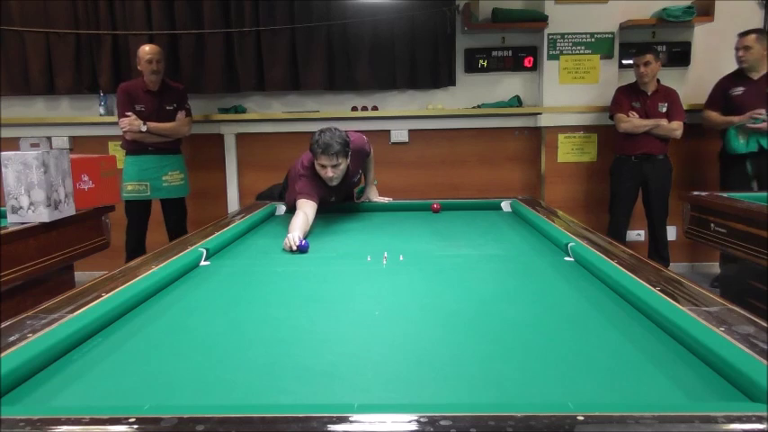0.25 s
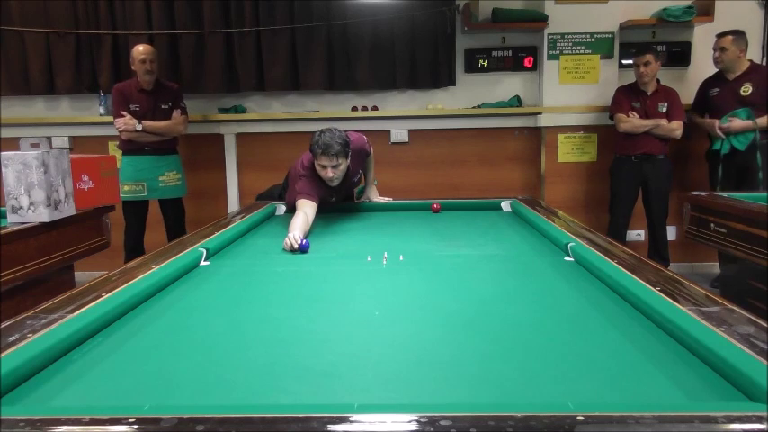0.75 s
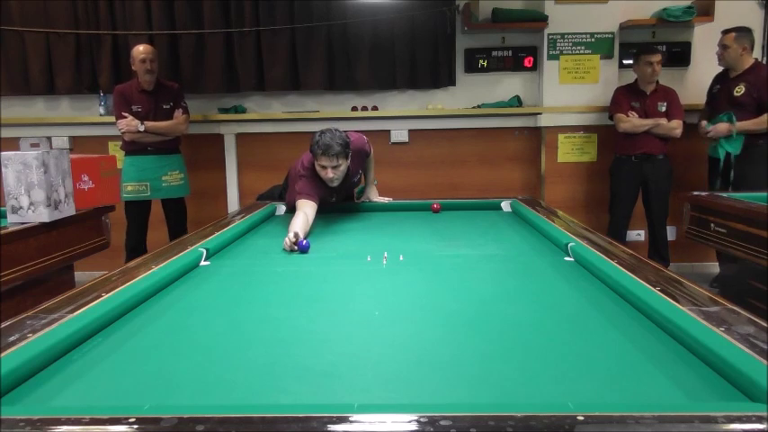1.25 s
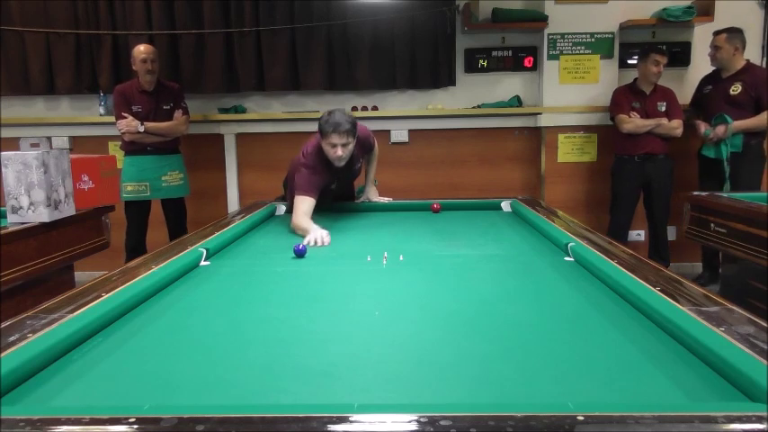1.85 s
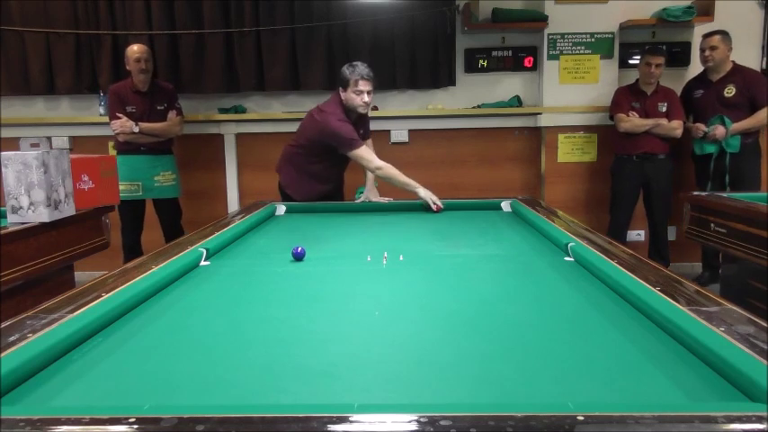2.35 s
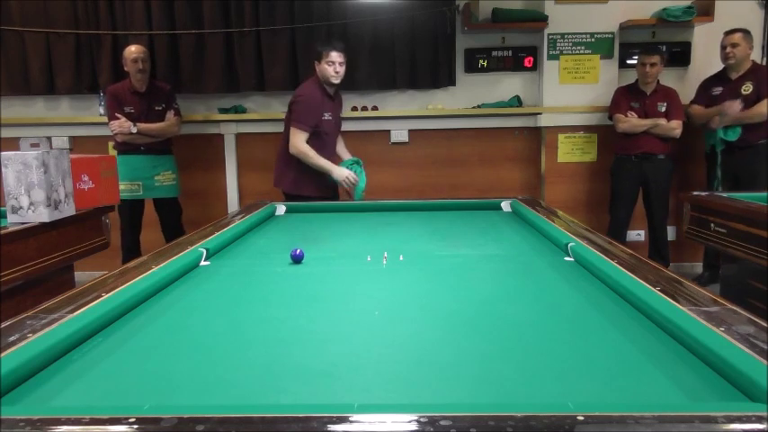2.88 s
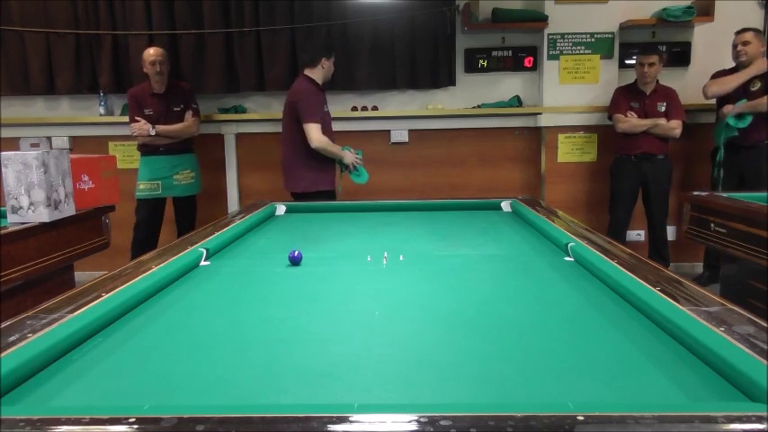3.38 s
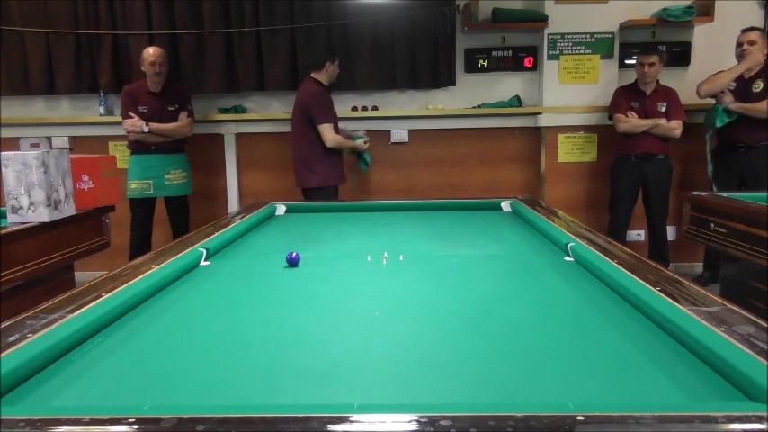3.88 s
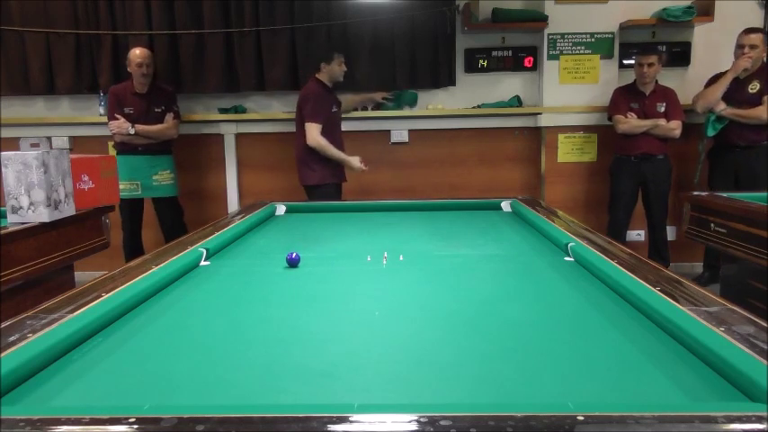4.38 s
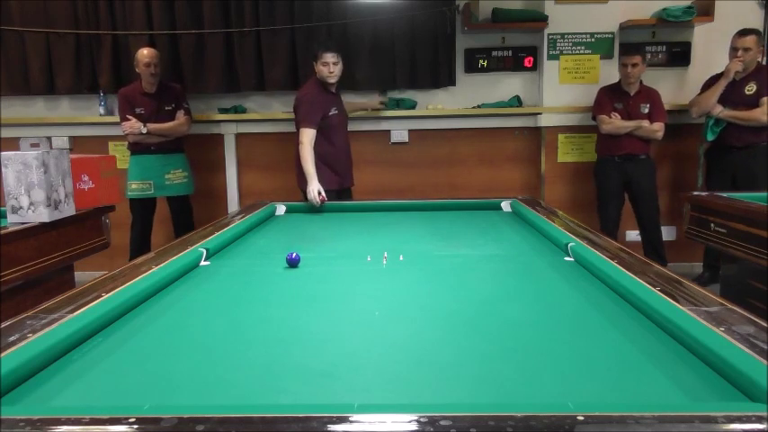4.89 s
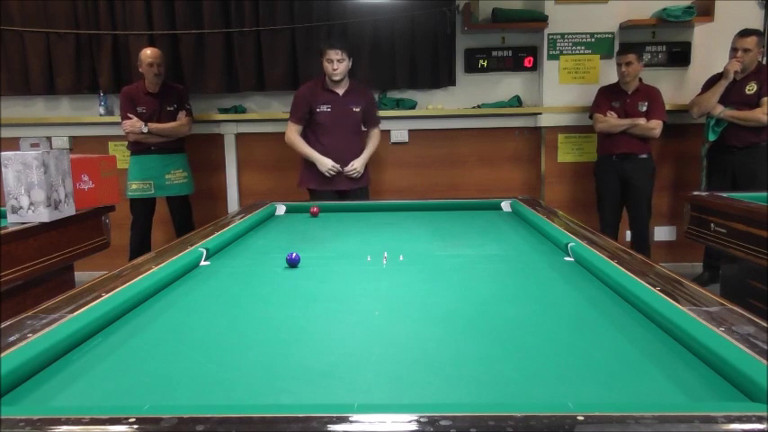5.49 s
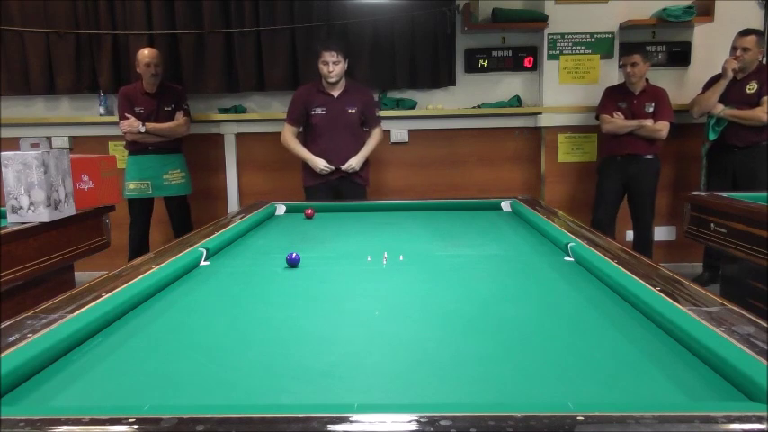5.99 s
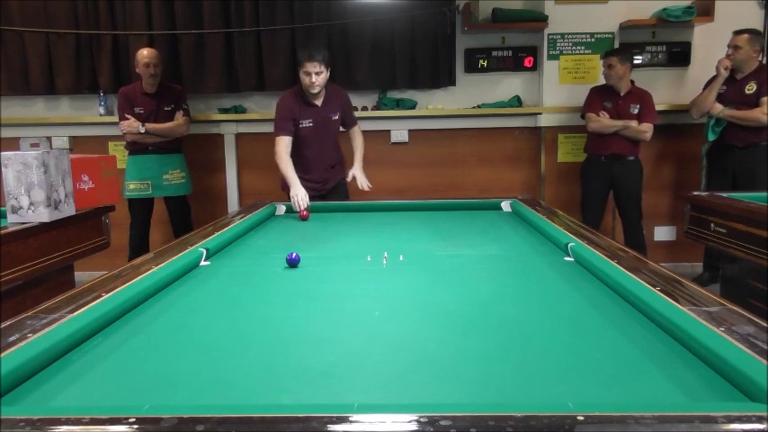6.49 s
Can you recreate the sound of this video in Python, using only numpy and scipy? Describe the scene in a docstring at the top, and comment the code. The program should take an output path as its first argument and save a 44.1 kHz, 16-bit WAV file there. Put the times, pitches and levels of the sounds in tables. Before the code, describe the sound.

An indoor billiard hall with steady low ventilation rumble, wavering hum and thin hiss. A ball is pressed and set down with muffled bumps, a hand sweeps airily over the cloth, and clothing rustles faintly with tiny ticks. Then a dropped ball strikes the slate very loudly and bounces faster and weaker. The microphone stands at the end of the table; the room drops quieter after the first blow.

```python
"""Dropped ball in a billiard hall

Place: a billiard hall; filtered noise makes the ventilation's rumble and wavering hum, over a thin steady hiss.
Microphone at the end of the table: a ball is set down, a hand sweeps the cloth, clothes rustle (shaped noise).
Then a dropped ball bounces ever faster on the slate; each blow rings table modes and dense hall noise. The
first bounce makes the gain control turn the whole room down, and it recovers only slowly."""
import sys
import numpy as np
from scipy import signal
from scipy.fft import rfft, irfft
from scipy.io import wavfile
from scipy.ndimage import uniform_filter1d

SR = 44100
rng = np.random.default_rng(int(sys.argv[2]) if len(sys.argv) > 2 else 0)


def unload_wav(signal):
    """Save mono or channel-first audio to the path in sys.argv[1] as 16-bit WAV at rate SR, clipped to [-1, 1]."""
    wavfile.write(
        sys.argv[1],
        SR,
        np.round(np.clip(np.atleast_2d(signal).T, -1, 1) * 32767).astype(np.int16),
    )


N = 297234  # length in samples

# Levels are those before the gain control; colour tables give relative levels.
# air rumble of the ventilation: pitch_hz, level_db_per_hz
VENT_COLOUR = [(20, -38), (33, -16), (60, -3), (80, -7), (100, -3), (130, -3.5), (160, -5.5), (300, -7),
               (420, -16.5), (560, -18.5), (780, -24.5), (1050, -35), (1280, -52), (2000, -72)]
# fan and duct resonances and a thin whine: pitch_hz, width_hz, level_db
HUM = [(35.5, 15, -38), (49.4, 1.5, -35), (66.8, 8.2, -41), (108.8, 16, -28.5), (117.8, 24, -29.5),
       (140, 16, -34), (490, 34, -44.5), (10050, 220, -69.5)]
# steady hiss: pitch_hz, level_db_per_hz
HISS_COLOUR = [(760, -42.5), (1300, -9), (1530, 1), (1890, -1.5), (2010, -1), (2530, -6), (4160, -6.5),
               (5280, -11), (5980, -3.5), (7360, 0), (11100, -2.5), (13400, -2.5), (15500, -4)]
# the room's lean to the left: pitch_hz, left_minus_right_db
ROOM_BALANCE = [(110, -1), (200, 0.5), (380, 5), (700, 3.5), (1300, 0.5), (2400, 0)]
# the room's left-right likeness: pitch_hz, likeness (1 = same in both channels)
ROOM_SAME = [(60, 0.94), (150, 0.91), (400, 0.93), (1000, 0.88), (1800, 1), (4000, 1), (6800, 1),
             (8500, 0.88), (10000, 0.067), (15000, 0.13)]
# decay of the hall: pitch_hz, t60_s
HALL = [(100, 0.64), (500, 0.39), (1000, 0.35), (2500, 0.3), (5000, 0.37), (8000, 0.41), (15000, 0.16)]
# lean of hits to the left: pitch_hz, left_minus_right_db
HIT_BALANCE = [(60, -3), (200, 0.5), (700, 5.5), (1290, 4), (2400, 2), (8000, -1.5)]
# left-right likeness of hits and cloth strokes: pitch_hz, likeness
HIT_SAME = [(60, 0.91), (300, 0.88), (1300, 0.78), (4000, 0.99), (7000, 1), (14000, 0.35)]
# hand gliding over the cloth: time_s, level_db
SWEEP = [(1.7, -61), (2.074, -39), (2.2, -43.5), (2.32, -57)]
# colour of the hand's sweep: pitch_hz, level_db_per_hz
SWISH_COLOUR = [(4000, -22), (5400, -15), (6300, -6), (7600, 3), (8800, 0), (10500, -5.5), (13000, -9),
                (16000, -12)]
# strokes of sleeves and the wiping cloth: middle_s, half_length_s, swish_db, scuff_db, scuff_hz
RUSTLES = [(.45, .15, -57, -66.5, 1800), (1.912, .15, -50, -57.5, 2150), (2.466, 0.098, -53, -55, 3080),
           (3.687, 0.022, -58, -68, 1700), (4.282, 0.021, -49, -55, 3340), (4.39, .04, -57, -60, 2940),
           (4.535, .02, -52, -59, 2200), (6.28, .045, -53.5, -74, 2500)]
# colour of a rustle's swish: pitch_hz, level_db_per_hz
SLEEVE_COLOUR = [(4000, -20), (5500, -14), (6500, -5.5), (7150, -2), (7450, 2), (7800, -1), (9600, -5),
                 (11000, -11), (16000, -16)]
# small handling ticks: start_s, level_db, low_edge_hz
TICKS = [(0.9048, -45.5, 1390), (1.2127, -51, 7400), (2.653, -49.5, 6500), (3.9794, -55, 7000),
         (4.1942, -56, 2000), (4.515, -57, 1600)]
# reflections of a light tap: pitch_hz, level_db_per_hz
SPRAY_COLOUR = [(100, 9), (750, 0.5), (1100, -5.5), (1700, 0), (3500, -10), (5200, -15.5), (7500, -10.5),
                (16000, -18)]
# a ball pressed onto the cloth bumps under the hand: start_s, first_bump_db, last_bump_db
PRESSES = [(.894, -28, -22), (1.304, -21, -26.5)]
# a ball set down by hand: start_s, force_db (0 = first bounce of the drop), hardness_hz
SET_DOWN = (1.3014, -15, 520)
# ringing of slate, frame and ball: pitch_hz, level_db, t60_s
TABLE_MODES = [(251.3, -2, 0.41), (280, -8, 0.2), (326.4, -1.5, 0.3), (416.3, -6, .35), (483, -11, 0.11),
               (523.7, -2, 0.53), (553.6, -0.5, 0.43), (639, 1.5, 0.21), (720, -8, 0.097), (831, -6, 0.23),
               (947, -10, 0.22), (988, -15, 0.5), (1046, -15, 0.2), (1082, -25, 0.19), (1230, -27, 0.22),
               (1652, -12, 0.28), (1700, -25, 0.4), (1797, -16, 0.17), (2110, -1.5, 0.12),
               (2111, -5.5, 0.15), (2150, -23, 0.1), (2485, -13, 0.18), (2710, -14, .22),
               (2873, -6.5, 0.13)]
# dense ring of the table in the hall: pitch_hz, level_db_per_hz
TABLE_COLOUR = [(40, -29), (110, -5.5), (190, -6.5), (290, 2), (400, -2), (570, -3), (900, -5),
                (1130, -14.5), (1280, -23), (1650, -17.5), (2900, -19), (3900, -28.5), (4500, -31.5),
                (16000, -92)]
# bright click of a blow: pitch_hz, level_db_per_hz
CLICK_COLOUR = [(1000, -44), (4000, -10), (5300, -7), (7000, 3.5), (9000, -1.5), (12000, -9.5),
                (16000, -16)]

VENT_DB, HISS_DB = -26.5, -52.5
# the player walks with the cloth in hand, rustling at random
FIDGET_FROM_S, FIDGET_TO_S, FIDGET_GAP_S, FIDGET_HALF_S = 2.6, 4.15, 0.16, 0.054
FIDGET_SWISH_DB, FIDGET_SCUFF_DB, FIDGET_SCUFF_HZ = -57.5, -70, 1900  # middle levels, band centre
TICK_TOP_HZ = 10800
# bump spacing, first pitch, pitch ratio to the bump before, bandwidth
BUMP_GAP_S, BUMP_HZ, BUMP_SINK, BUMP_OCTAVES = 0.026, 552, 0.723, 1.2
DROP_S, FIRST_FLIGHT_S = 5.082, 0.172  # the dropped ball first lands, and stays in the air this long
# share of its speed that the ball keeps: the cloth swallows more of a slow blow
REBOUND_FAST, REBOUND_SLOW = 0.779, 0.708
FORCE_POWER = 0.91  # force grows with landing speed to this power
HARD_HZ, HARD_POWER = 2460, 0.66  # first contact's hardness as a corner; it follows speed to this power
EDGE_HZ = 15750  # upper limit of the band


def amp(db):
    """Decibels to gain."""
    return 10 ** (np.asarray(db) / 20)


def evened(x):
    """Scales to rms 1."""
    return x / np.sqrt(np.mean(x ** 2) + 1e-20)


def punch(x, size=1764):
    """Scales a hit to rms 1 over its first 40 ms."""
    return x / np.sqrt(np.mean(x[:, :size] ** 2))


def read(points, hz):
    """Reads a table along a log-frequency axis."""
    f, value = np.transpose(points)
    return np.interp(np.log(hz + 1), np.log(f), value)


def add(mix, s, sound):
    """Mixes a stereo sound in at time s."""
    part = mix[:, round(s * SR):][:, :sound.shape[1]]
    part += sound[:, :part.shape[1]]


def noise(colour, same, balance, size=N):
    """Stereo noise with a given spectrum, left-right likeness and balance."""
    hz = np.fft.rfftfreq(size, 1 / SR)
    mid, side = rfft(rng.standard_normal((2, size)))
    likeness = np.clip(read(same, hz), -1, 1)
    sign = np.array([[1], [-1]])  # left, right
    pair = np.sqrt(1 + likeness) * mid + sign * np.sqrt(1 - likeness) * side
    pair *= amp(sign * read(balance, hz) / 2)
    return evened(irfft(pair * amp(read(colour, hz)), size))


def hall_tail(colour, early_db, early_s, rise_s, size=32768):
    """About 0.7 s of dense ringing: an extra early part, while each band dies at the hall's pace."""
    hz, t, z = signal.stft(noise(colour, HIT_SAME, HIT_BALANCE, size=size), SR, nperseg=256)
    decay = amp(-60 * t / read(HALL, hz)[:, None])
    tail = signal.istft(z * decay, SR, nperseg=256)[1][:, :size]
    t = np.arange(size) / SR
    early = 1 + amp(early_db) * np.exp(-t / early_s)
    return tail * early * (1 - np.exp(-t / rise_s))


def background():
    """Rumbling air with a wavering hum (noise through narrow resonances), over a thin steady hiss."""
    hz = np.fft.rfftfreq(N, 1 / SR)
    hum = np.zeros(N)
    for centre, width, db in HUM:
        resonance = 1 / (1 + (2 * (hz - centre) / width) ** 2)
        hum += amp(db) * evened(irfft(rfft(rng.standard_normal(N)) * resonance, N))
    air = amp(VENT_DB) * noise(VENT_COLOUR, ROOM_SAME, ROOM_BALANCE)
    hiss = amp(HISS_DB) * noise(HISS_COLOUR, ROOM_SAME, ROOM_BALANCE)
    return hum + air + hiss


def fidgets(spread_db=2):
    """Faint strokes of clothing at uneven times and strengths, as rows like RUSTLES."""
    rows = []
    for s in np.arange(FIDGET_FROM_S, FIDGET_TO_S, FIDGET_GAP_S):
        late, swish, scuff = rng.uniform(-1, 1, 3)
        middle = s + FIDGET_GAP_S * late / 2
        swish_db = FIDGET_SWISH_DB + spread_db * swish
        scuff_db = FIDGET_SCUFF_DB + spread_db * scuff
        rows.append((middle, FIDGET_HALF_S, swish_db, scuff_db, FIDGET_SCUFF_HZ))
    return rows


def cloth(grain_db=0.5):
    """Fibres rubbing: one long sweep of the hand, and brief rustles of clothes."""
    t = np.arange(N) / SR
    s, db = np.transpose(SWEEP)
    sweep_db = np.interp(t, s, db, left=-120, right=-120)
    out = amp(sweep_db) * noise(SWISH_COLOUR, HIT_SAME, ROOM_BALANCE)
    sleeve = noise(SLEEVE_COLOUR, HIT_SAME, ROOM_BALANCE)
    rub = rng.standard_normal(N)
    for middle, half, swish_db, scuff_db, scuff_hz in RUSTLES + fidgets():
        band = signal.butter(2, [scuff_hz / 1.33, scuff_hz * 1.33], "band", fs=SR, output="sos")
        scuff = evened(signal.sosfilt(band, rub))
        stroke = np.exp(-0.5 * ((t - middle) / half) ** 2)
        out += stroke * (amp(swish_db) * sleeve + amp(scuff_db) * scuff)
    # the weave catches and slips
    grain = evened(uniform_filter1d(rng.standard_normal(N), size=200))
    return out * amp(grain_db * grain)


def tap(low_hz, high_hz, damped_s=0.2):
    """A light tap, damped by the hand, with its short spray of reflections."""
    top_hz = np.clip(high_hz, low_hz + 50, SR / 2 - 100)
    band = signal.butter(3, [low_hz, top_hz], "band", fs=SR, output="sos")
    spray = hall_tail(SPRAY_COLOUR, early_db=-6.0, early_s=0.0011, rise_s=0.00025)
    damping = np.exp(-np.arange(spray.shape[1]) / SR / damped_s)
    return punch(signal.sosfilt(band, spray * damping))


def ticks():
    """Thin ticks, band-limited taps, as fingers handle the balls."""
    out = np.zeros((2, N))
    for s, db, low_hz in TICKS:
        add(out, s, amp(db) * tap(low_hz, TICK_TOP_HZ))
    return out


def presses(count=4):
    """A ball settles under the hand in a quick run of bumps, each lower in pitch than the one before."""
    out = np.zeros((2, N))
    spread = 2 ** (BUMP_OCTAVES / 2)
    for s, first_db, last_db in PRESSES:
        for k, db in enumerate(np.linspace(first_db, last_db, count)):
            hz = BUMP_HZ * BUMP_SINK ** k
            add(out, s + k * BUMP_GAP_S, amp(db) * tap(hz / spread, hz * spread))
    return out


def table_response(modes_db=-8.0, dense_db=-2, bend_s=0.00556, runner_db=-6, runner_s=0.0059):
    """What one sharp blow on the slate sounds like from the end of the table: modes over a dense ring."""
    dense = punch(hall_tail(TABLE_COLOUR, early_db=-2, early_s=0.044, rise_s=0.0003))
    t = np.arange(dense.shape[1]) / SR
    modes = np.zeros_like(dense)
    for hz, db, t60 in TABLE_MODES:
        turn = rng.random() + 0.081 * rng.standard_normal((2, 1))  # phase in cycles, nearly alike left and right
        lean = amp(np.array([[0.5], [-0.5]]) * read(HIT_BALANCE, hz))
        decay = np.exp(-np.log(1000) * t / t60)
        modes += lean * amp(db) * decay * np.sin(2 * np.pi * (hz * t + turn))
    modes *= 1 - np.exp(-(t / 0.001) ** 2)  # soft onset
    ring = amp(dense_db) * dense + amp(modes_db) * punch(modes)
    # bending waves in the slate: the treble runs ahead, the bass arrives a few ms later
    hz = np.fft.rfftfreq(len(t), 1 / SR)
    delay = bend_s / (1 + (hz / 900) ** 2)
    phase = 2 * np.pi * np.cumsum(delay) * hz[1]
    ring = irfft(rfft(ring) * np.exp(-1j * phase))
    # the forerunner is weak until the whole bed sounds
    return ring * amp(runner_db * np.exp(-(t / runner_s) ** 4))


def click(rough_db=4, spikes_db=-3, spikes_s=0.0091, count=4):
    """The bright click of a hard blow: a rough burst with a few spikes of overload distortion, then a thin tail."""
    tail = hall_tail(CLICK_COLOUR, early_db=13, early_s=0.037, rise_s=0.0027)
    size = tail.shape[1]
    rough = evened(uniform_filter1d(rng.standard_normal(size), size=50))
    burst = punch(tail * amp(rough_db * np.clip(rough, -2, 2)))
    spikes = np.zeros(size)
    places = (SR * spikes_s * rng.uniform(0.25, 1, count)).astype(int)
    spikes[places] = rng.choice([-1, 1], count)
    spikes = irfft(rfft(spikes) * amp(read(CLICK_COLOUR, np.fft.rfftfreq(size, 1 / SR))))
    return punch(burst + amp(spikes_db) * punch(spikes[None]))


def bounces(count=9):
    """Each landing is slower, so weaker, duller and sooner followed: rows like SET_DOWN."""
    s, speed, rows = DROP_S, 1, []  # speed relative to the first landing
    for _ in range(count):
        force_db = 20 * np.log10(speed ** FORCE_POWER)
        rows.append((s, force_db, HARD_HZ * speed ** HARD_POWER))
        s += FIRST_FLIGHT_S * speed
        speed *= min(REBOUND_SLOW + (REBOUND_FAST - REBOUND_SLOW) * speed, 1)
    return rows


def balls(level_db=-1.66, click_db=-33.0, click_growth=2.27, click_delay_s=0.0044):
    """Every blow rings the same table; slower blows sink into the cloth for longer and sound duller."""
    out = np.zeros((2, N))
    ring = punch(table_response())
    for s, force_db, corner_hz in [SET_DOWN] + bounces():
        softness = signal.butter(2, corner_hz, fs=SR, output="sos")
        add(out, s, amp(level_db + force_db) * signal.sosfilt(softness, ring))
        # the click comes after the wave in the slate, and grows steeply with force
        add(out, s + click_delay_s, amp(click_db + click_growth * force_db) * click())
    return out


def scene():
    """All sources at the microphone, from the room to the ball."""
    return background() + cloth() + ticks() + presses() + balls()


def record(dry, limit_db=-9.5, recover_db_per_s=2.0):
    """Gain control drops at once on a loud hit and creeps back; peaks clip; then the band limit."""
    power = uniform_filter1d((dry ** 2).mean(0), size=900)
    power_db = 10 * np.log10(abs(power) + 1e-12)
    creep = recover_db_per_s * np.arange(N) / SR
    over_db = np.maximum(power_db - limit_db, 0)
    cut_db = np.maximum.accumulate(over_db + creep) - creep  # holds the deepest cut, less the recovery
    held = np.clip(dry * amp(-uniform_filter1d(cut_db, size=200)), -0.96, 0.96)
    lowpass = signal.firwin(511, EDGE_HZ, window=("kaiser", 9), fs=SR)
    return signal.oaconvolve(held, lowpass[None], "same")


dry = scene()
out = record(dry)
unload_wav(out)
```